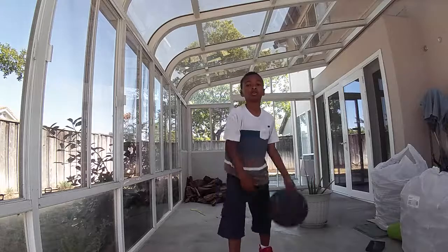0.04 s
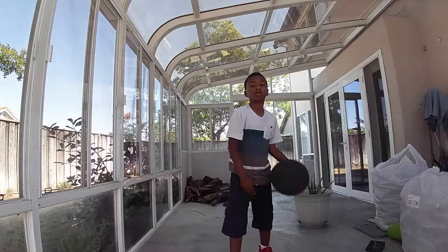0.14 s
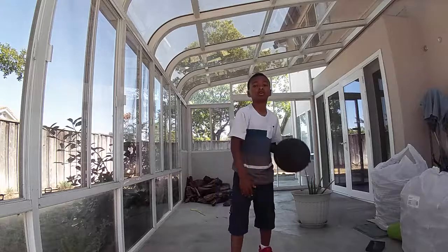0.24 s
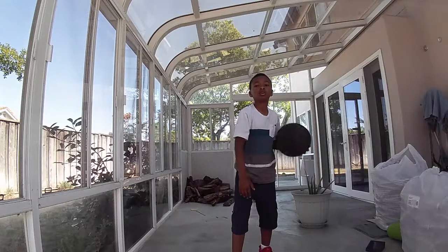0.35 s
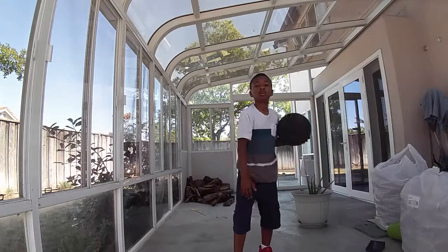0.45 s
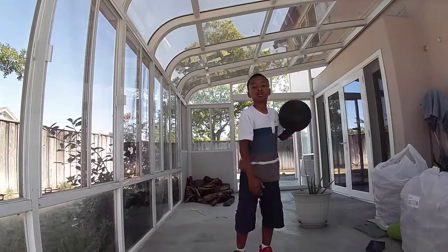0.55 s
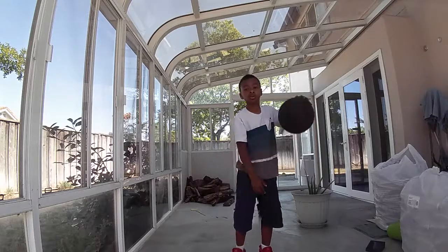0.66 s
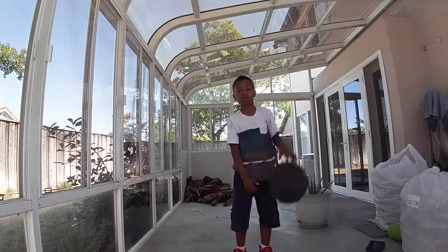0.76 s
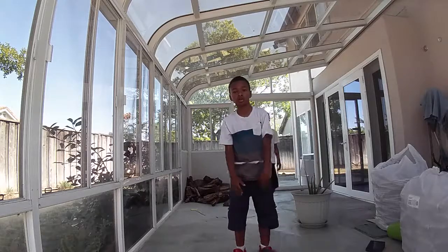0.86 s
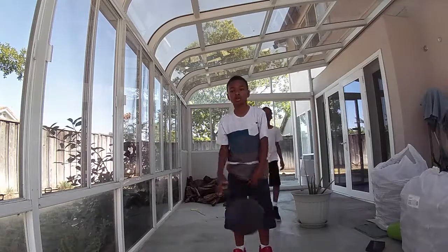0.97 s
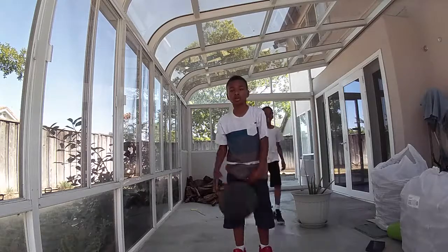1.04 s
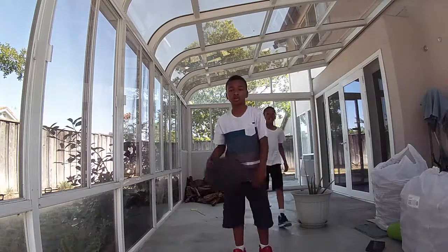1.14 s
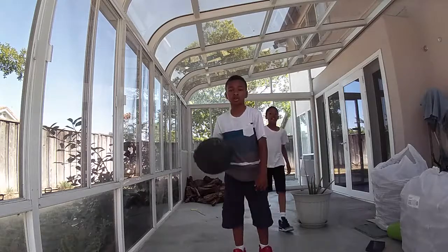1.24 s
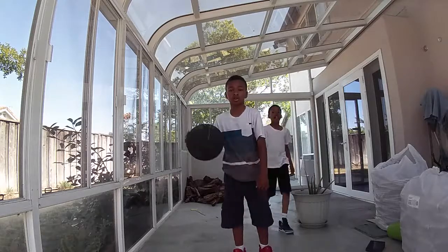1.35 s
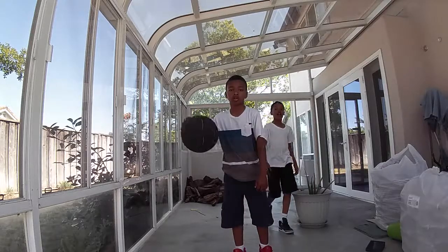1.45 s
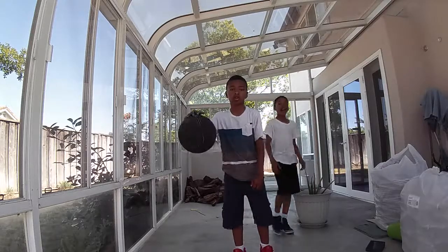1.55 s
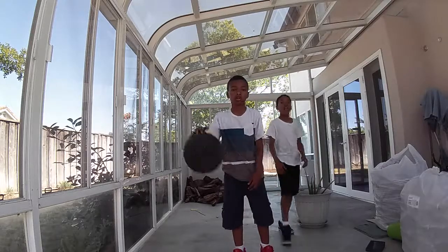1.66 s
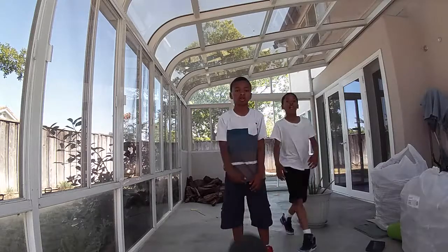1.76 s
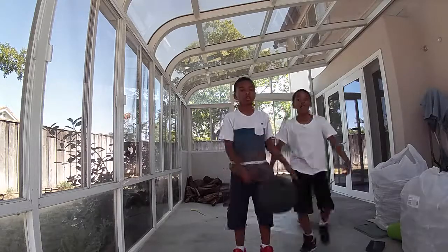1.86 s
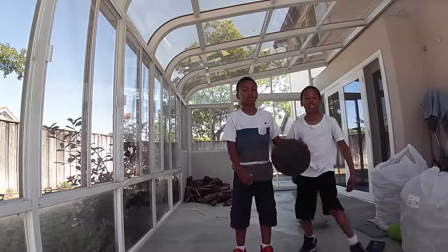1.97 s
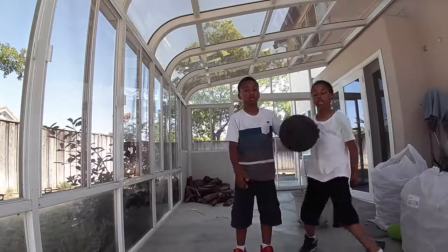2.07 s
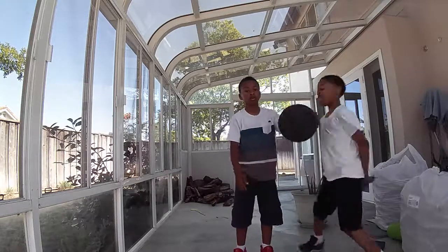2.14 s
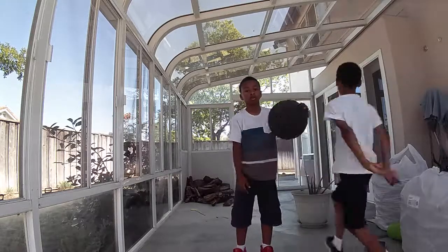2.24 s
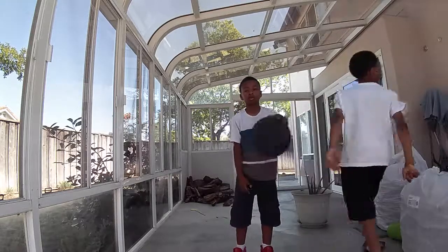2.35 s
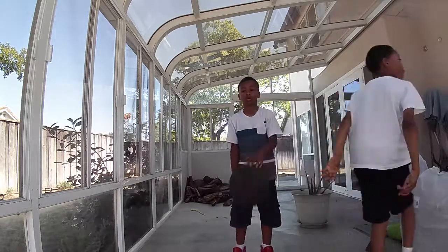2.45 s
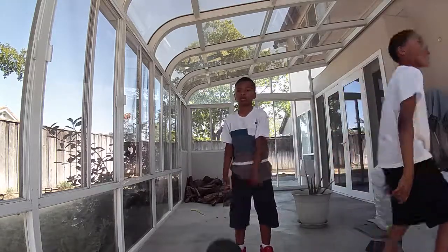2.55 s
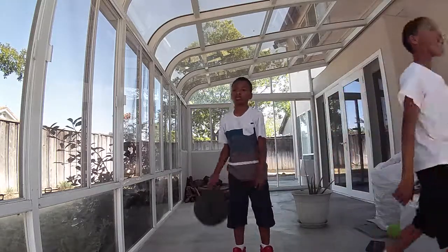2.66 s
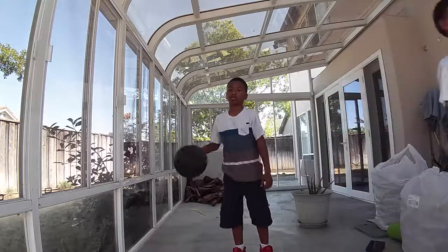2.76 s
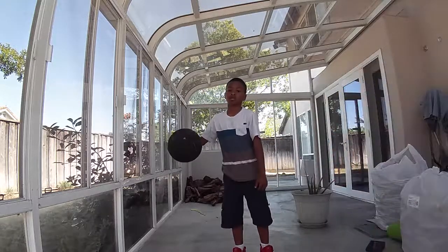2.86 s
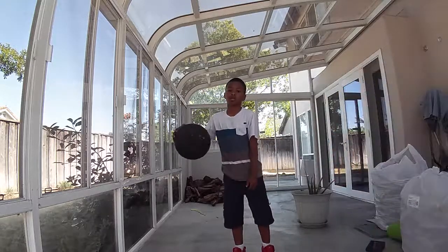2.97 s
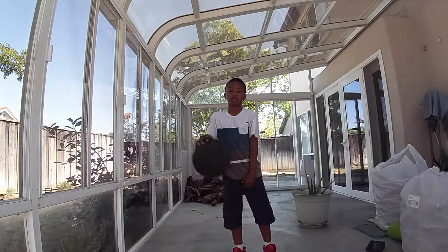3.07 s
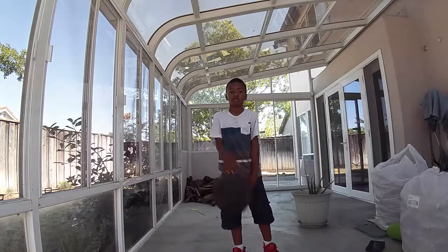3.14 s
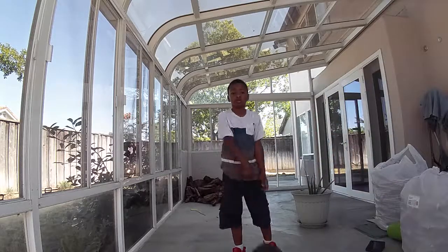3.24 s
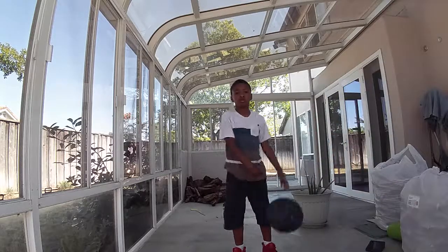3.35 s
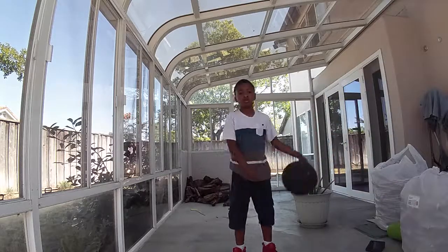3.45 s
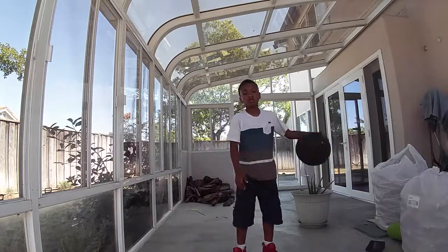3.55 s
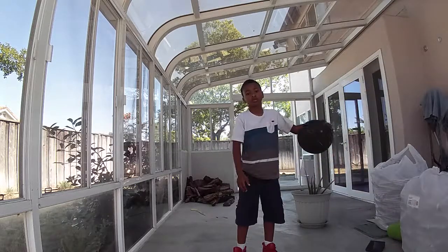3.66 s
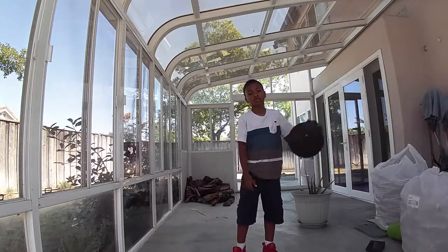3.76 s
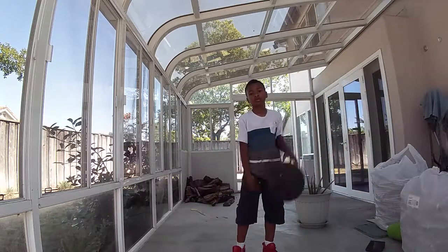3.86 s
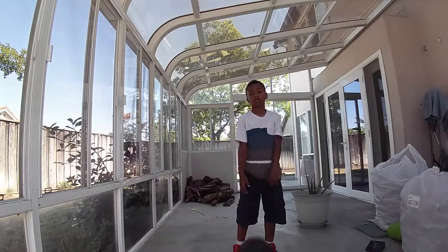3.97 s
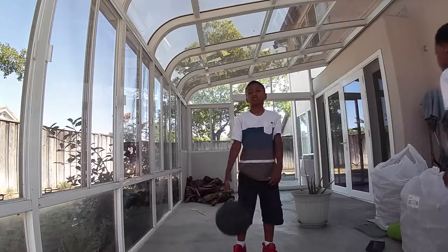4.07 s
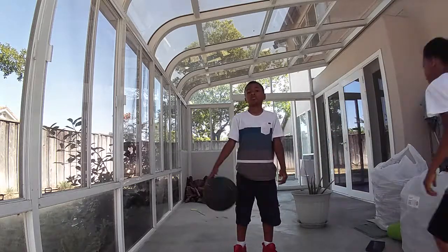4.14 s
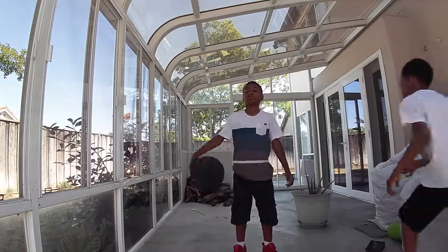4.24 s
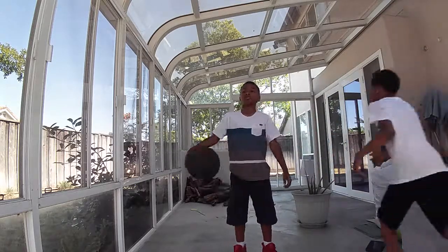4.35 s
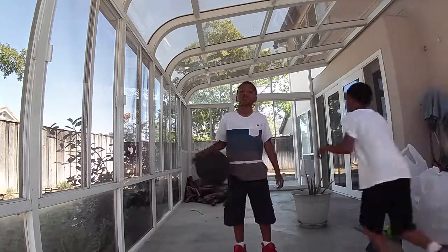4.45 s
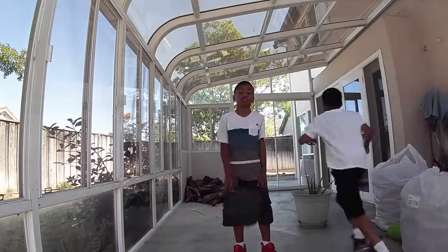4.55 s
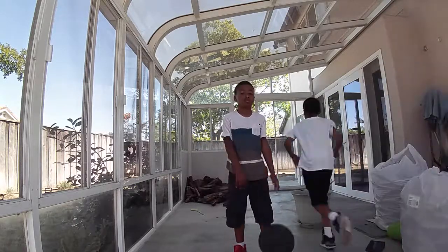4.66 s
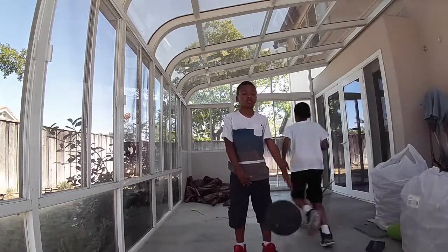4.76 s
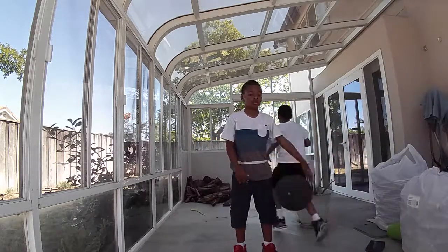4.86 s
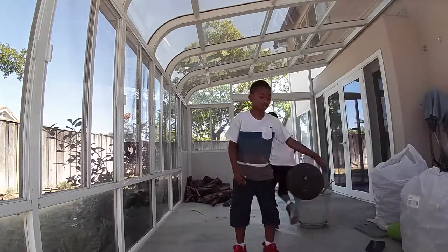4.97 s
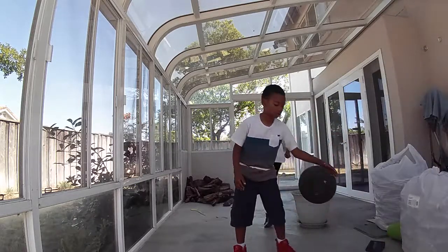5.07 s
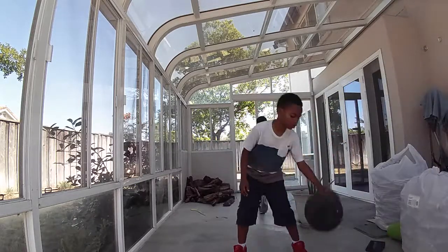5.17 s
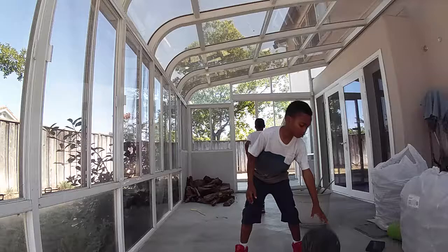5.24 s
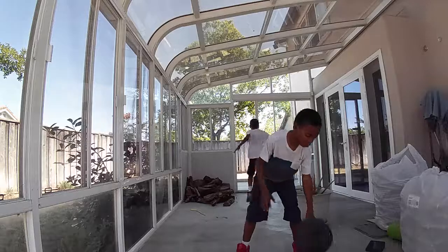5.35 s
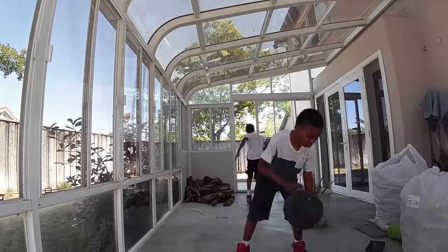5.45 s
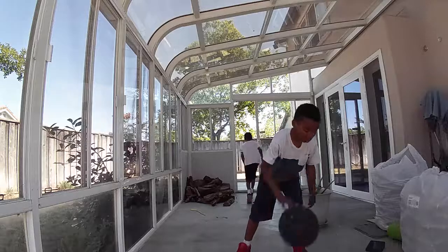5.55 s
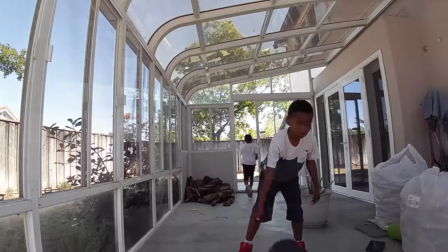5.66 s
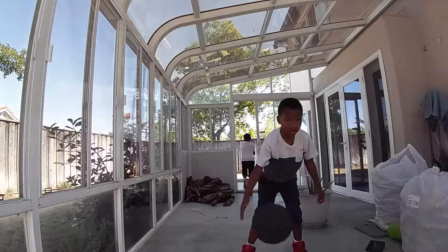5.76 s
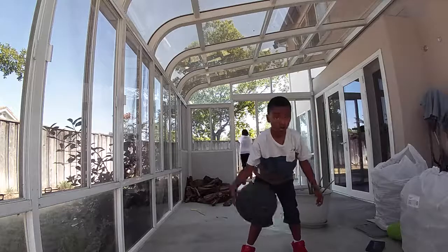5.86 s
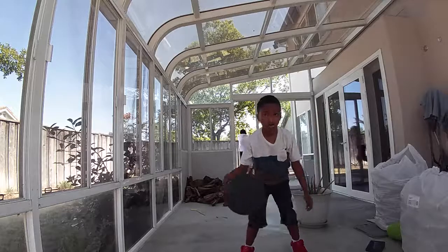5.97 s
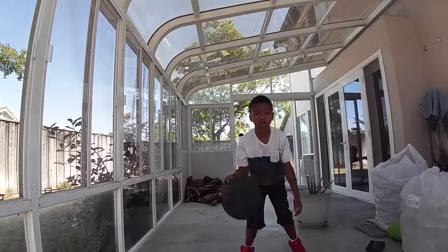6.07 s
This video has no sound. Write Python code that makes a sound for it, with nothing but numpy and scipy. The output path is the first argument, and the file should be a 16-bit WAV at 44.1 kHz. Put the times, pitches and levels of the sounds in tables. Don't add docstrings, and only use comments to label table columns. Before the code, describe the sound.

A basketball bounces slowly on concrete in a narrow glass porch, a few steps from a small stereo camera. Each hit is a sharp crack with a deep boom, a hollow ringing ping and a brief bright echo. Between hits come soft palm slaps, shoe taps, scuffs and faint sole whistles. The last two bounces are weaker and closer together. Distant traffic rumbles faintly underneath.

```python
import sys
import numpy as np
from scipy import signal
from scipy.fft import rfft, irfft, next_fast_len
from scipy.io import wavfile
from scipy.ndimage import uniform_filter1d

SR = 44100
rng = np.random.default_rng(int(sys.argv[2]) if len(sys.argv) > 2 else 0)


def gain_from_db(level_db):
    decades = np.asarray(level_db, float) / 20
    return 10 ** decades


def waveform_to_disk(signal):
    frames = np.transpose(np.atleast_2d(signal))
    scaled = np.clip(frames, -1, 1) * 32767
    samples = np.round(scaled).astype(np.int16)
    wavfile.write(sys.argv[1], SR, samples)


N = 269362
LEAD = SR // 5
TAIL = 3 * SR // 4

# (frequency [Hz], width [Hz], level [dB])
BALL_MODES = [(663, 277, -5.5), (902, 306, -3), (1160, 195, 1), (1274, 790, -6.5)]
# (time [s], knock [dB], scrape over knock [dB], thud over knock [dB])
PALM_HITS = [
    (.284, -48, -12, -16),
    (.561, -63.5, -25, 2),
    (.847, -48, -21, -13),
    (1.452, -46.5, -8, -4.5),
    (3.108, -41, -5.5, -1.5),
    (3.7848, -39.5, -4.5, -9),
    (3.958, -43, -13, -1.5),
    (4.2962, -37.5, -6.5, -1),
    (5.126, -39.5, -14, -3),
    (5.448, -44.5, 7.5, 5),
]


def unit(x):
    return x / np.sqrt(np.mean(x ** 2) + 1e-20)


def loud(x, db, length):
    return gain_from_db(db) * x * np.sqrt(length * SR / np.mean(np.sum(x ** 2, -1)))


def along(points, hz):
    f, v = np.transpose(points)
    return np.interp(np.log(hz + 1), np.log(f + 1), v)


def filtered(x, response):
    m = next_fast_len(x.shape[-1] + 8192)
    return irfft(rfft(x, m) * response(np.fft.rfftfreq(m, 1 / SR)), m)[..., :x.shape[-1]]


def causal(points):
    def response(hz):
        cepstrum = irfft(np.log(gain_from_db(along(points, hz))))
        half = len(cepstrum) // 2
        cepstrum[1:half] *= 2
        cepstrum[half + 1:] = 0
        return np.exp(rfft(cepstrum))
    return response


def resonant(modes):
    def response(f):
        total = 0
        for k, (centre, width, db) in enumerate(modes):
            damping = 1j * f * width
            total = total + (-1) ** k * gain_from_db(db) * damping / (centre * centre - f * f + damping)
        return total
    return response


def add(track, s, sound):
    part = track[:, LEAD + round(s * SR):][:, :sound.shape[1]]
    part += sound[:, :part.shape[1]]


def spread(pair):
    # (frequency [Hz], left-right likeness [0 to 1])
    likeness = [(130, 0.95), (290, 0.96), (640, 0.85), (1400, 0.47), (3100, 0.35), (6800, 0.12),
                (9000, 0.038), (12000, 0.62)]

    def mid_side(hz):
        turn = np.arccos(np.clip(along(likeness, hz), -1, 1)) / 2
        return np.array([np.cos(turn), np.sin(turn)])

    mid, side = filtered(pair, mid_side)
    return np.array([mid + side, mid - side])


def porch(build_s):
    # (frequency [Hz], t60 [s])
    decay = [(100, 1), (300, 0.71), (800, 0.65), (2000, 0.68), (5000, 0.66), (13500, 0.43)]
    hz, t, z = signal.stft(rng.standard_normal((2, TAIL)), SR, nperseg=256)
    fading = z * gain_from_db(-60 * t / along(decay, hz)[:, None])
    tail = spread(signal.istft(fading, SR, nperseg=256)[1][:, :TAIL])
    return tail * (1 - np.exp(-np.arange(TAIL) / SR / build_s))


def hum():
    # (frequency [Hz], level per Hz [dB])
    rumble = [(18, -44), (30, -20), (64, -4), (131, -14), (358, -52), (517, -29), (639, -30), (1830, -40.5),
              (8920, -47), (15100, -48), (16400, -49)]
    noise = filtered(rng.standard_normal((2, N)), lambda hz: gain_from_db(along(rumble, hz)))
    return gain_from_db(-49.5) * unit(spread(noise))


def drags():
    # (time [s], length [s], from [Hz], to [Hz], level [dB])
    whistles = [
        (.63, .23, 5700, 4600, -62),
        (1.3, .17, 2040, 2170, -48),
        (1.14, .15, 2750, 2680, -53),
        (1.32, .17, 2780, 2880, -51),
    ]
    edge_db = 12
    t, total = np.arange(N) / SR, 0
    for s, length, from_hz, to_hz, db in whistles:
        u = np.clip((t - s) / length, 0, 1)
        swell = gain_from_db(db - edge_db * (2 * u - 1) ** 2) * (u > 0) * (u < 1)
        flutter = uniform_filter1d(rng.standard_normal((2, N)), size=110)
        flutter = unit(uniform_filter1d(flutter, size=90))
        pitch = from_hz + (to_hz - from_hz) * u ** 2
        total = total + swell * flutter * np.sin(2 * np.pi * np.cumsum(pitch) / SR)
    return total


def contacts():
    # (time [s], scrape [dB], scrape [Hz], thud over scrape [dB], knock over scrape [dB])
    steps = [
        (.379, -63, 2560, 0.5, 3),
        (1.091, -46.5, 10900, 3.5, -10),
        (1.902, -47, 5800, -4, 1.5),
        (2.883, -37.5, 1970, -13, -23),
        (4.281, -39.5, 4700, -1, -13),
        (4.5, -53, 5000, 5.5, 4.5),
        (4.9, -35, 5700, -4, -7.5),
        (5.086, -48, 2900, 2.5, -1),
        (5.455, -45.5, 2000, -11, 7),
    ]
    # (time [s], scrape [dB], scrape [Hz], contact length [s], knock over scrape [dB])
    scuffs = [(0.2, -60.5, 10700, 0.061, 1), (.66, -66, 2580, .03, 8.5), (0.764, -65, 1810, .027, 1),
              (1.201, -53.5, 2760, 0.039, -22), (1.293, -55.5, 6100, 0.024, 0),
              (1.465, -39.5, 6600, .011, -2.5), (1.946, -53.5, 6960, 0.023, 1),
              (2.091, -49, 2820, 0.034, -9), (2.169, -43, 4360, 0.032, -15),
              (2.852, -26.5, 6500, 0.0058, -17.5), (3.108, -46, 7600, 0.024, -2),
              (4.627, -37, 4350, .011, -8), (5.119, -37.5, 10500, 0.01, -11),
              (5.143, -34.5, 6200, 0.008, -16), (5.903, -61, 11100, 0.025, 1)]
    palm_s, palm_hz = 0.00029, 2300
    step_s = 0.0021
    scuff_thud_db = -6.5
    touched = []
    for s, db, scrape, thud in PALM_HITS:
        touched.append((s, db + scrape, db, db + thud, palm_s, palm_hz))
    for s, db, hz, thud, knock in steps:
        touched.append((s, db, db + knock, db + thud, step_s, hz))
    for s, db, hz, length, knock in scuffs:
        touched.append((s, db, db + knock, db + knock + scuff_thud_db, length, hz))
    return touched


def touches():
    # (frequency [Hz], width [Hz], level [dB])
    slab = [(65.3, 28, -3.5), (243, 45, -1.5), (428, 115, -11)]
    track, t, hz = np.zeros((2, LEAD + N)), np.arange(TAIL) / SR, np.arange(10, SR / 2, 10)
    knock, thud = unit(abs(resonant(BALL_MODES)(hz))), unit(abs(resonant(slab)(hz)))
    for s, scrape_db, knock_db, thud_db, length, scrape_hz in contacts():
        force = t / length * np.exp(1 - t / length)
        fed = np.sqrt(np.cumsum(force ** 2 * gain_from_db(120 * np.minimum(t, .5) / .68)))
        direct = loud(force * rng.standard_normal(TAIL), -10.5, 0.89)
        sound = loud(fed * porch(0.0011), 0, 1) + direct
        if length < .0015:
            sound[:, :6] -= gain_from_db(-15) * np.sqrt(SR) * np.hanning(8)[1:-1]
        slope = [(scrape_hz / 5, -14), (scrape_hz, 0), (scrape_hz * 3, -10), (scrape_hz * 8, -30)]
        scrape = unit(gain_from_db(along(slope, hz)))
        power = (gain_from_db(scrape_db) * scrape) ** 2
        power = power + (gain_from_db(knock_db) * knock) ** 2 + (gain_from_db(thud_db) * thud) ** 2
        colour = causal(np.c_[hz, 10 * np.log10(power)])
        add(track, s, filtered(loud(sound, 3.34, 0.028 + 2 * length), colour))
    return track[:, LEAD:]


def pats():
    pat_db, pat_hz, pat_t60 = 11.5, 800, 0.065
    track, t = np.zeros((2, LEAD + N)), np.arange(SR // 5) / SR
    detunes = rng.normal(1, 0.047, (len(PALM_HITS), 2, 1))
    for (s, db, *_), detune in zip(PALM_HITS, detunes):
        fade = gain_from_db(db + pat_db - 60 * t / pat_t60) * (1 - np.exp(-t / .0015))
        add(track, s, fade * np.sin(2 * np.pi * pat_hz * detune * t))
    return track[:, LEAD:]


def boom(t, spread_db, ports_db):
    # (frequency [Hz], level [dB], t60 [s], polarity at the camera [+1 or -1])
    waves = [(44.3, -39, 0.36, -1), (56.47, -15, 0.61, -1), (66.93, -22, 0.67, -1), (70, -9, 0.16, 1),
             (87.46, -16.5, 0.44, 1), (105.6, -20, 0.46, -1), (112.45, -27.5, 0.47, -1),
             (130.7, -25, 0.63, -1), (143.8, -27.5, 0.47, -1), (153.8, -24.5, 0.45, -1),
             (170.2, -31, 0.17, -1), (231.4, -29, 0.82, -1), (282, -52.5, 0.95, -1), (356, -38, 0.75, -1)]
    hz, db, t60, polarity = np.transpose(waves)[..., None, None]
    db = db + spread_db * hz / 100 * rng.standard_normal(hz.shape)
    db = db + ports_db * rng.standard_normal((len(waves), 2, 1))
    u = np.maximum(t - .0005, 0)
    return np.sum(np.sign(polarity) * gain_from_db(db - 60 * u / t60) * np.sin(2 * np.pi * hz * u), 0)


def crack(t, echo_s):
    # (frequency [Hz], level [dB])
    slap = [(700, 12), (4000, 2), (9000, 0.5), (16000, -14)]

    def spit(u, life):
        noise = spread(rng.standard_normal((2, len(t))))
        return (u >= 0) * np.exp(-np.abs(u) / life) * noise

    snap = -gain_from_db(-20.5) * np.exp(-t / 0.00071) * np.cos(2 * np.pi * 900 * t)
    u = np.maximum(t - echo_s - .0008, 0)
    ping = gain_from_db(-5.5) * u / 0.0023 * np.exp(-u / 0.0026) * np.sin(2 * np.pi * rng.uniform(720, 1000) * u)
    bursts = gain_from_db(-17) * spit(t, 0.00042) + gain_from_db(-2.5) * spit(t - echo_s, 0.0004)
    return ping + filtered(snap + bursts, causal(slap))


def ring(t, modes):
    total = 0
    for hz, db, t60 in modes:
        wander = np.cumsum(rng.standard_normal((2, len(t))), 1) * .032 + rng.uniform(0, 2 * np.pi)
        total = total + gain_from_db(db - 60 * t / t60) * np.sin(2 * np.pi * hz * t + wander)
    return (1 - np.exp(-t / 0.011)) * total


def ball():
    # (time [s], force [dB], brightness [dB], pitch the landing spot favours [Hz], ring [dB])
    bounces = [
        (-.1105, 7, 3, 800, -10.5),
        (0.8712, 6.5, 2, 967, -11),
        (1.5927, 8, -3, 715, -22),
        (2.4173, 7, 2.5, 682, -14),
        (3.239, 5, 0.85, 849, -11),
        (3.9779, 7, 2, 826, -10.5),
        (4.6604, 5.5, -2, 836, -21),
        (5.2629, 2.5, -2, 950, -17),
        (5.6395, 3.5, -4.5, 830, -15),
    ]
    # (frequency [Hz], level [dB], t60 [s])
    air_modes = [(616.5, -0.5, 0.4), (661, 0, 0.58), (743, 4.5, 0.58), (778, 2.5, 0.63), (800, -6, 0.51),
                 (850, -0.5, 0.57), (914, -11.5, 1), (950, -10.5, 0.74), (976, -1, 0.61), (990, -15, 0.61),
                 (1075, 6.5, 0.45), (1203, 5.5, 0.26), (1289, 6.5, 0.31)]
    # (frequency [Hz], level per Hz [dB])
    wash_colour = [(180, 5.5), (260, 12.5), (420, 7.5), (1500, -2), (3000, 0), (7000, -4), (12000, -11.5),
                   (16000, -25)]
    fall_db, floor_db = 116, -15
    track, t = np.zeros((2, LEAD + N)), np.arange(TAIL) / SR
    early = 88
    squeeze = gain_from_db(-7) * np.exp(-np.arange(early, 0, -1) / SR / 0.00015) * np.ones((2, 1))
    for s, force_db, bright_db, spot_hz, ring_db in bounces:
        body = loud(filtered(porch(0.0014), resonant(BALL_MODES)), -28 + 1.88 * force_db, 0.032)
        body = filtered(body, causal([(spot_hz / 1.24, 0), (spot_hz, 3), (spot_hz * 1.36, 0)]))
        wash = loud(filtered(porch(0.00061), causal(wash_colour)), -20 + bright_db, 0.058)
        modes = []
        for hz, db, t60 in air_modes:
            loss_db = max(floor_db, -fall_db * abs(np.log2(hz / spot_hz)))
            modes.append((hz, ring_db + db + loss_db, t60))
        snap = gain_from_db(1.3 + 0.31 * bright_db) * crack(t, .0024)
        low = gain_from_db(force_db) * boom(t, spread_db=1.26, ports_db=0.5)
        add(track, s - early / SR, squeeze)
        add(track, s, low + snap + body + ring(t, modes) + wash)
    return track[:, LEAD:]


def scene():
    return hum() + drags() + touches() + pats() + ball()


def roll_off(x):
    return signal.sosfilt(signal.butter(12, 16510, fs=SR, output="sos"), x)


def record(dry):
    # (frequency [Hz], gain [dB])
    housing = [(430, -1.5), (520, -7.5), (600, 2), (5500, -1), (7200, 2.5), (8300, 0.5), (9000, -6.5),
               (10000, 0.5), (13000, 0.5), (15500, -1.5)]
    # (frequency [Hz], left minus right [dB])
    tilt = [(60, 0.0), (110, 0.0), (200, 0.0), (380, 0.5), (700, 2.0), (1290, 2.5), (2380, 2.5),
            (4400, -0.5), (8120, -2.5), (15000, 0.5)]
    top_hz = 15800
    x = signal.lfilter(*signal.butter(2, 33, "high", fs=SR), dry)
    x = filtered(x, causal(housing))
    x = filtered(x, lambda hz: gain_from_db(along(tilt, hz) * np.array([[.5], [-.5]])) * (hz < top_hz))
    x = x / (1 + np.abs(x / .9) ** 6) ** (1 / 6)
    return roll_off(x)


dry = scene()
out = record(dry)
waveform_to_disk(out)
```